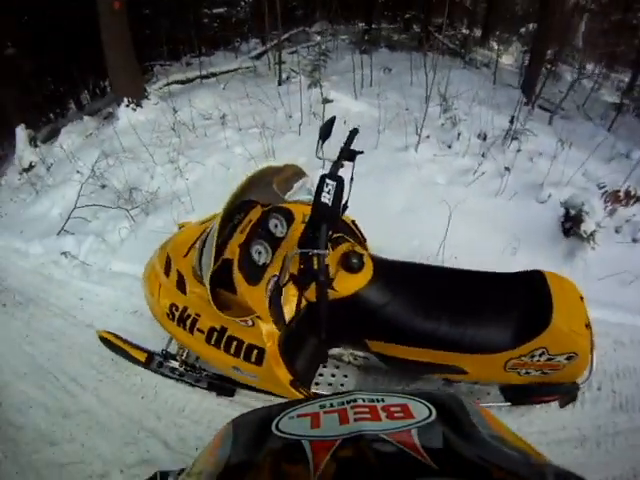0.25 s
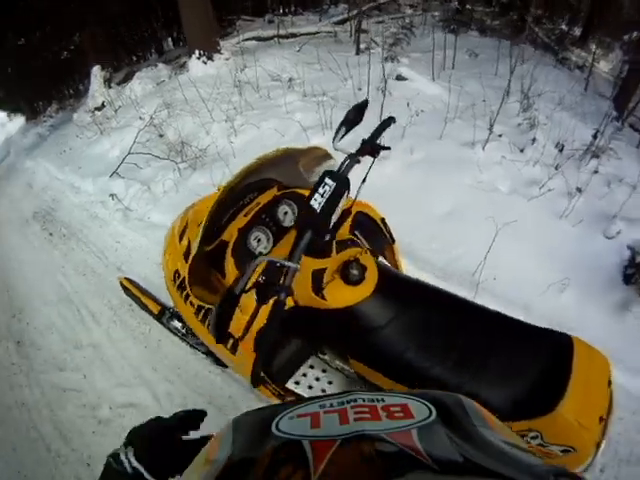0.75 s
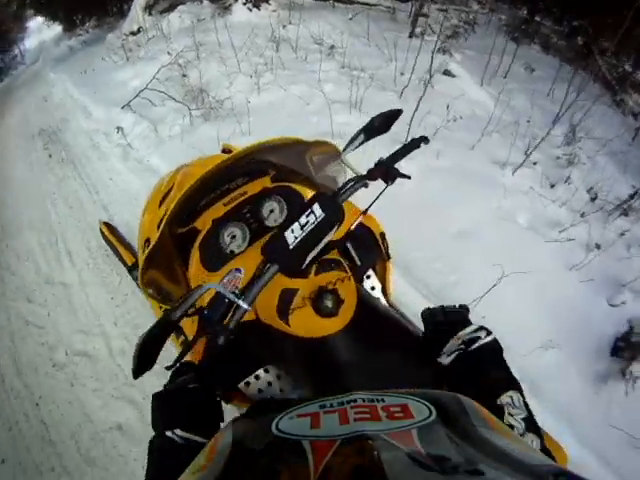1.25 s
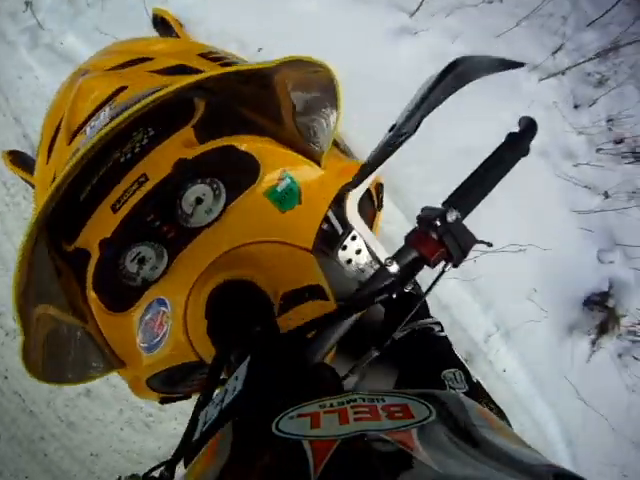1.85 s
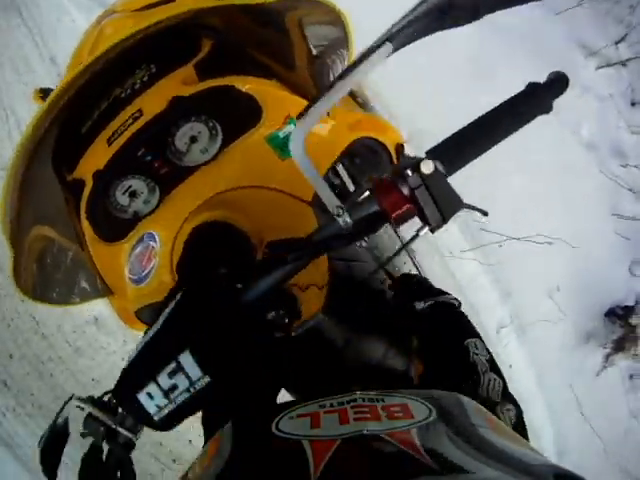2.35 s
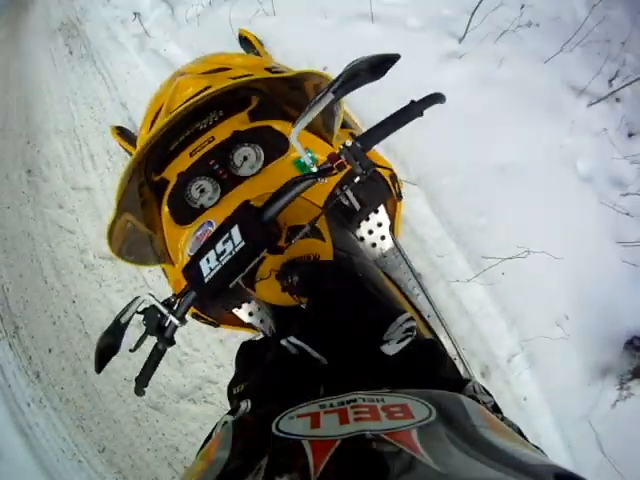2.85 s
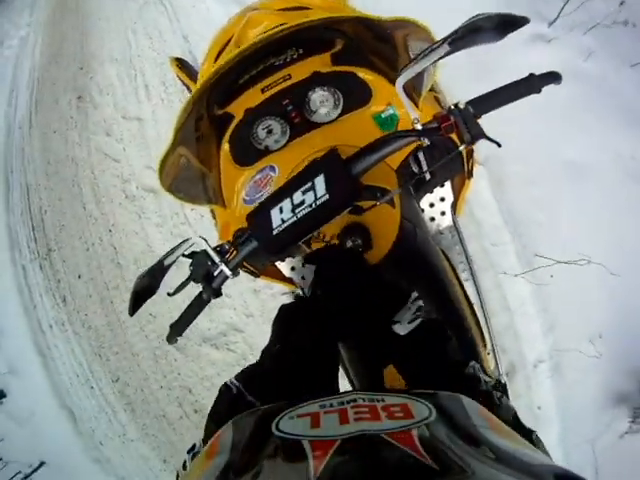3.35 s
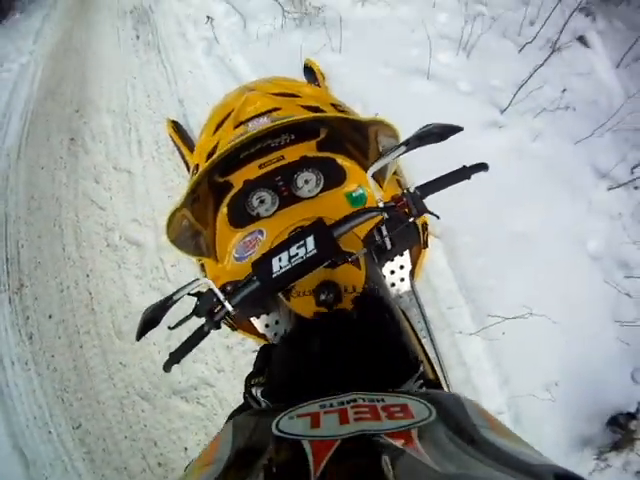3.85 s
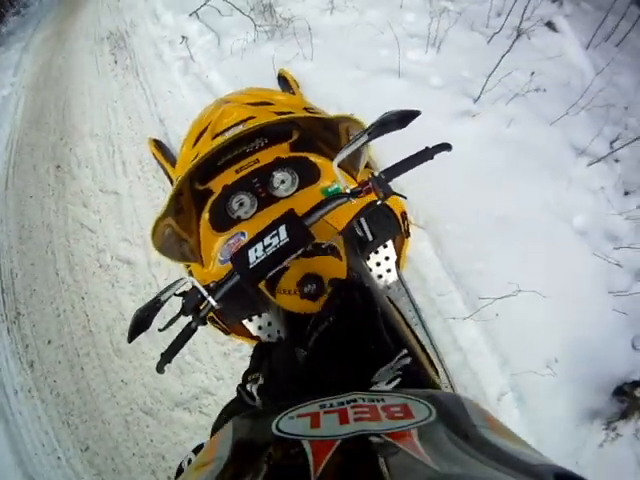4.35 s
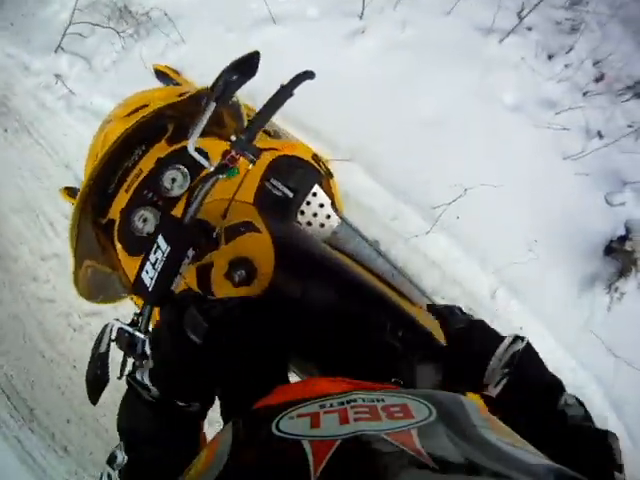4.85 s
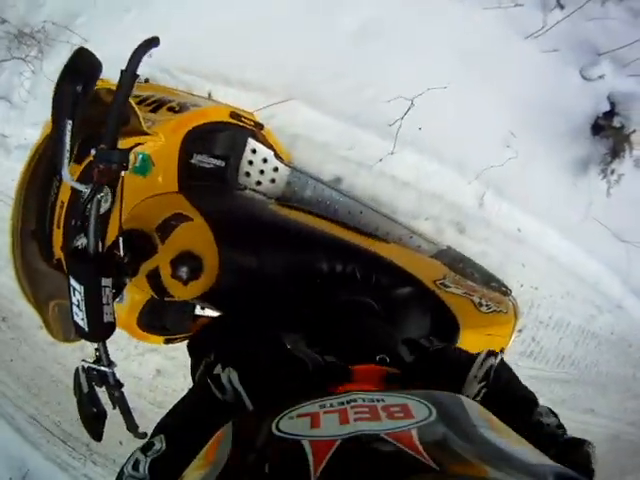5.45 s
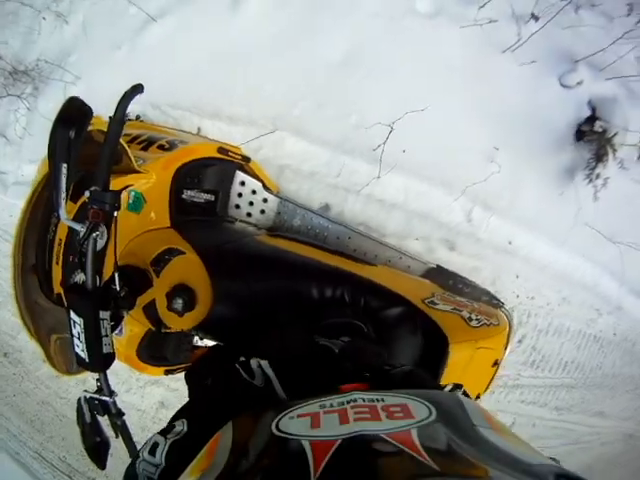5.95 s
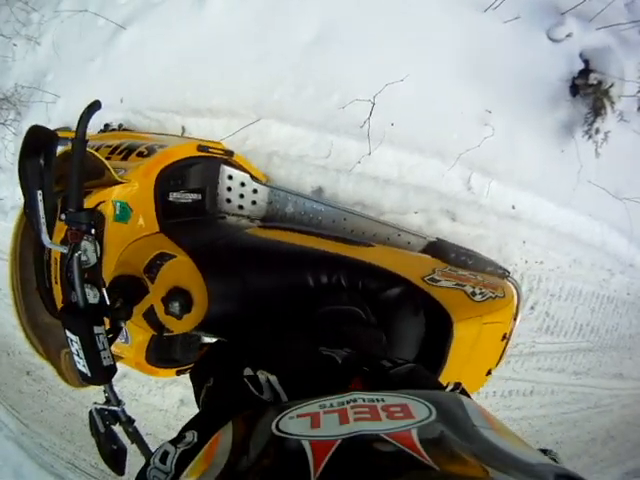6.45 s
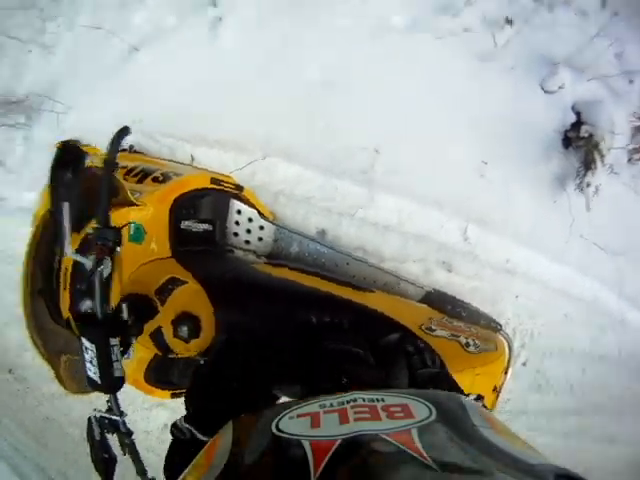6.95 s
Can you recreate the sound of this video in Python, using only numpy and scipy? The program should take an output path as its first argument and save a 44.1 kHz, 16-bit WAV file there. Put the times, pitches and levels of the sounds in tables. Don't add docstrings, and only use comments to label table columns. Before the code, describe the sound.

Close, boxy idling of a small two-cylinder snowmobile, popping and ticking as the rider climbs on, with rustles, thuds and sharp knocks on the microphone housing.

```python
import sys
import numpy as np
from scipy import signal
from scipy.io import wavfile
from scipy.ndimage import uniform_filter1d

SR = 44100
rng = np.random.default_rng(int(sys.argv[2]) if len(sys.argv) > 2 else 0)


def gain_from_db(level_db):
    decades = np.asarray(level_db, float) / 20
    return 10 ** decades


def persist_wave(psi):
    counts = np.round(np.clip(psi, -1, 1) * 32767).astype(np.int16)
    wavfile.write(sys.argv[1], SR, np.atleast_2d(counts).T)


N = 317520

# time in seconds, turns per second.
CRANK = [(0.0, 19.89), (1.0, 20.05), (1.4, 20.382), (2.0, 20.165), (2.2, 20.604), (2.8, 19.806),
         (3.2, 20.235), (3.6, 20.063), (4.0, 20.46), (4.4, 20.085), (4.6, 20.697), (4.8, 20.25),
         (5.6, 20.395), (5.8, 20.065), (7.0, 20.354), (7.2, 20.045)]
# time in seconds, lean over the engine, way past the silencer, turn to the outlet (0-1).
RIDER = [(0, 0.06, 0, .1), (.4, 0.2, 0.17, 0), (1.0, 0.19, 0.16, 0), (1.4, .35, 0.37, 0),
         (1.7, 0.8, 0.62, 0.5), (2.0, 1, 1, 0.88), (2.3, 0.92, 0.83, 0.9), (2.45, 0.98, 1, 0.67),
         (3.0, .9, 0.92, 0.63), (3.45, .9, 1, 0.6), (3.75, 0.76, 1, .4), (4.05, 0.48, 0.93, 0.06),
         (4.7, 0.28, 0.98, 0.04), (5.2, 0.48, 1, 0.95), (5.55, 0.43, 0.99, 0.86), (6.0, 0.32, 1, 0.8),
         (6.6, 0.23, 1.01, 0.73), (7.2, 0.4, 1, 0.7)]

# level in dB, then change in dB at full lean, past silencer, at outlet.
HUM_HEARD = [
    (-32, 1.1, -2.1, -2.15),
    (-43.5, 1.5, -18.5, 1),
    (-75, 13, 10, -0.56),
]
POPS_HEARD = [
    (-63.5, .3, 13.9, 1.5),
    (-84.5, .3, 18, 20.5),
]
RATTLE_HEARD = [
    (0, 2.5, -1.5, 1),
    (0, .3, 1.3, 2),
    (0, 0.93, -2.8, 2.2),
    (0, 8.4, -0.3, -1.6),
    (0, 4.5, 0.3, -0.7),
]
SLAP_HEARD = [
    (-54, 0, 0, 0),
    (-63, 1, -2, 7),
]
TICK_HEARD = [
    (-79, 24, 0, -1),
]

# multiple of crank speed, level in dB rms.
STEADY_ORDERS = [(2, -57.5), (4, -53), (7, -56), (10, -66.5), (12, -69.5), (14, -76), (18, -71.5)]

# time in seconds, low level in dB, high level in dB.
FULL_CHARGE = [
    (2.079, -54, -59),
    (2.161, -55, -60),
    (2.338, -37, -57),
    (2.66, -37, -56),
    (3.189, -42, -57),
    (3.312, -40, -42),
    (6.325, -43, -52),
    (6.349, -51, -45),
]
RUN_START_S, RUN_STEP_S = 5.674, .0747
RUN_LOW_DB, RUN_HIGH_DB, RUN_SWELL_DB = -40.5, -43, 5

REGION_HZ = [560, 870, 1250, 2000, 3400]
# frequency in Hz, density in dB per Hz.
RATTLE_COLOUR = [(100, -29), (170, -3), (189, -16), (317, -10), (517, -17.5), (591, -16.5), (1010, -19),
                 (1140, -15), (1910, -17), (2610, -19.5), (3030, -16), (4320, -35), (5010, -34),
                 (5900, -42), (7670, -72), (13000, -120)]
# frequency in Hz, burst over steady part in dB, lag in turns, first cylinder over second in dB.
BURST = [(300, 0, .28, 0), (900, -4, .28, 0), (1400, 0, 0, 1), (2100, 2, 0, -1), (3000, 3, 0, 2),
         (3700, 1, 0, 2), (4600, -5, 0, 0)]
# frequency in Hz, width in Hz, lift in dB.
CAVITY = [(610.4, 17, 7), (1053, 48, -5), (1159, 55, 5), (1690, 76, 7), (1942, 96, 7), (2260, 150, 1.5),
          (2344, 95, 8.5), (3026, 180, 7), (3810, 100, 7.5), (4904, 475, 11.5)]
RATTLE_DB = -49.5

# time in seconds, change of the lower cowl mode in dB.
VENT = [(1.9, -1), (2.3, 9), (2.5, 9), (2.65, -5), (3.3, -2), (3.9, 7), (4.4, 1), (5.1, 6), (5.3, -6)]
SHIELD_CLEARS_S, SHIELD_LOSS_DB = 2.35, 5

# time in seconds, peak in dB, length in seconds.
SWAYS = [(0.314, -57, 0.084), (.5, -45, 0.13), (0.708, -58, .03), (.9, -52, .05), (1.02, -49, 0.093),
         (1.464, -43, 0.058), (1.6, -54, .04), (1.83, -33.5, 0.054), (2.086, -44.5, .07),
         (2.228, -44, 0.11), (2.356, -43, .05), (2.526, -44, 0.15), (2.67, -44, .05), (2.78, -46, 0.14),
         (2.9, -46, .04), (3.06, -43, .06), (3.348, -43, 0.061), (3.663, -46, 0.14), (4.0, -52, .15),
         (4.455, -44, .15), (4.833, -52, .1), (5.25, -29, 0.044), (5.468, -38, .06), (5.93, -37, 0.046),
         (6.11, -44, 0.038), (6.24, -43.5, .05), (6.467, -41, .07), (6.991, -48, .08), (7.15, -52, .05)]
# time in seconds, ring in dB, thud in dB.
JOLTS = [
    (1.797, -25.5, -40),
    (2.99, -29, -36),
    (5.203, -34, -16),
    (5.232, -25, -30),
    (5.37, -39, -35),
    (5.43, -36, -37),
    (6.349, -43, -31),
]
MOUNT_HZ, MOUNT_WIDTH_HZ = 90, 8
SWAY_RISE_SHARE, STILL_DB = 0.66, -59
RUMBLE_DB, RUMBLE_FOLLOWS, RUMBLE_SMOOTH_S = -58.5, 0.79, .3

# start in seconds, length in seconds, panel in Hz, width in Hz, level in dB rms.
SCUFFS = [(.1, 1.25, 620, 32, -64), (.15, .35, 1900, 300, -55), (.39, .2, 670, 90, -58),
          (.46, .041, 1120, 130, -52), (.46, .2, 1950, 330, -51), (.56, .047, 1130, 40, -50),
          (1.6855, .004, 3000, 3000, -46), (1.7135, .012, 4700, 1800, -50), (2.22, .3, 2990, 90, -58),
          (2.97, .051, 213, 34, -49), (2.975, .051, 680, 130, -54), (4.815, .012, 4750, 500, -51),
          (5.167, .11, 1880, 540, -49.5), (5.17, .09, 5000, 1800, -65), (5.184, .09, 660, 200, -54),
          (5.35, .07, 5400, 1500, -67), (5.363, .07, 620, 180, -55), (5.94, .16, 4800, 700, -64),
          (6.8288, .005, 2600, 4000, -40), (6.946, .076, 670, 400, -53), (7.001, .058, 1900, 460, -49.5)]

# time in seconds, housing peak in dB, low shell thump in dB, bright edge in dB.
KNOCKS = [
    (1.6872, -31, -58, -54),
    (1.7958, -1.5, -28.5, -34),
    (2.9903, -32, -53, -65),
    (4.82, -50, -56, -66),
    (5.2435, -33, -69, -63),
    (6.8308, -33, -54, -49),
    (7.1761, -35, -64, -65),
]
# frequency in Hz, level in dB, t60 in seconds.
HOUSING = [(1956, -1, 0.025), (2310, -2.5, 0.017), (1575, -4, 0.027), (2515, 4.5, 0.012)]
SHELL = [(196, -3.5, 0.1), (317, -5, 0.055), (638, 6.5, 0.038), (818, 2.5, 0.04), (1136, -0.5, 0.023)]
EDGE = [(3540, -8, 0.0089), (3610, 10, 0.018), (4874, 8.5, 0.015), (5700, -9, 0.028)]


def rms_one(x):
    return x / np.sqrt(np.mean(x ** 2) + 1e-20)


def in_time(rows):
    s, *columns = np.transpose(rows)
    return [np.interp(np.arange(N) / SR, s, c) for c in columns]


def at_hz(points, hz, axis=1):
    points = np.array(points)
    return np.interp(np.log(hz), np.log(points[:, 0]), points[:, axis])


def drift(rate_hz):
    r = np.exp(-80 * np.pi * rate_hz / SR)
    noise = rng.standard_normal(N // 40 + 2002)
    slow = signal.lfilter([1], [1, -2 * r, r * r], noise)[2000:]
    return np.interp(np.arange(N) / 40, np.arange(len(slow)), rms_one(slow))


def resonance(x, hz, width_hz):
    r = np.exp(-np.pi * width_hz / SR)
    poles = [1, -2 * r * np.cos(2 * np.pi * hz / SR), r * r]
    return signal.lfilter(np.array([1, 0, -1]) * (1 - r * r) / 2, poles, x)


def band_pass(x, low_hz, high_hz, order=2):
    return signal.sosfilt(signal.butter(order, [low_hz, high_hz], "band", fs=SR, output="sos"), x)


def ring(times_s, db, hz, t60_s, spread_hz, path_hz=None, count=1):
    clicks = np.full(N, 1e-18)
    clicks[(np.asarray(times_s) * SR).astype(int)] = gain_from_db(np.asarray(db))
    for _ in range(count):
        clicks = resonance(clicks, path_hz or hz, spread_hz)
    r, w = gain_from_db(-60 / (t60_s * SR)), 2 * np.pi * hz / SR
    return signal.lfilter([0, np.sin(w)], [1, -2 * r * np.cos(w), r * r], clicks)


def heard(parts):
    return [db + np.dot(change_db, in_time(RIDER)) for db, *change_db in parts]


def passes(turns, angle_turns, count):
    return np.nonzero(np.diff(np.floor(count * (turns - angle_turns))))[0] / SR


def level_at(parts, s, uneven_db):
    chance_db = uneven_db * rng.standard_normal(400)[:len(s)]
    return [db[(s * SR).astype(int)] + chance_db for db in heard(parts)]


def exhaust_hum(turns):
    sixth_db, eighth_db, sixteenth_db = heard(HUM_HEARD)
    orders = [(6, sixth_db, 0.84), (8, eighth_db, 1.25), (16, sixteenth_db - 6.0, 1.65)]
    orders += [(k, db, 3.0) for k, db in STEADY_ORDERS]
    out = 0
    for k, db, waver_db in orders:
        wobble_rad = 0.54 * waver_db * drift(6.1)
        level = np.sqrt(2) * gain_from_db(db + waver_db * drift(23.0))
        out = out + level * np.sin(2 * np.pi * k * turns + wobble_rad)
    return out


def full_run(count=8):
    k = np.arange(count)
    swell_db = -RUN_SWELL_DB * np.exp(-k / 1.2)
    return np.array([RUN_START_S + RUN_STEP_S * k, RUN_LOW_DB + swell_db, RUN_HIGH_DB + swell_db])


def pops(turns):
    s = passes(turns, .17, count=2)
    usual = [s, *level_at(POPS_HEARD, s, 4.5)]
    full = np.hstack([np.transpose(FULL_CHARGE), full_run()])
    full = full - [[.003], [0], [0]]
    s, low_db, high_db = np.hstack([usual, full])
    out = ring(s, low_db + 2, 289, 0.023, 290)
    out += ring(s, low_db - 4.5, 216.0, 0.075, 190)
    return out + ring(s, high_db - 1, 820, 0.021, 300)


def engine_rattle(turns, start_turns=.38, swell_turns=.085):
    regions_db = np.array(heard(RATTLE_HEARD))
    regions_db -= regions_db.mean(axis=1, keepdims=True)
    edges_hz = np.geomspace(170, 5900, 22)
    white, shared = rng.standard_normal((2, N)), rng.standard_normal(400)
    cylinder = np.resize([.5, -.5], 400)
    out = 0
    for k, (low_hz, high_hz) in enumerate(zip(edges_hz, edges_hz[1:])):
        hz = np.sqrt(low_hz * high_hz)
        firings = 2 * (turns + 1 - start_turns - at_hz(BURST, hz, axis=2))
        since = firings % 1 / 2 / swell_turns
        uneven_db = 0.8 * shared + 1.3 * rng.standard_normal(400)
        strength = gain_from_db(at_hz(BURST, hz) + at_hz(BURST, hz, axis=3) * cylinder + uneven_db)
        gate = 1 + strength[firings.astype(int)] * since * np.exp(1 - since)
        place = np.interp(np.log(hz), np.log(REGION_HZ), np.arange(5))
        below_db, above_db = regions_db[int(place)], regions_db[min(int(place) + 1, 4)]
        level_db = below_db + place % 1 * (above_db - below_db)
        noise = band_pass(white[k % 2] * rms_one(gate), low_hz, high_hz, order=3)
        out = out + gain_from_db(at_hz(RATTLE_COLOUR, hz) + level_db) * noise
    out = out + sum((gain_from_db(db) - 1) * resonance(out, hz, width_hz) for hz, width_hz, db in CAVITY)
    return gain_from_db(RATTLE_DB) * rms_one(out)


def slap(turns):
    s = passes(turns, .41, count=1)
    low_db, high_db = level_at(SLAP_HEARD, s, 1.6)
    low_db = low_db + np.interp(s, *np.transpose(VENT))
    return ring(s, low_db + 3, 2990, .05, 200) + ring(s, high_db + 7, 3660, .05, 200)


def tick(turns):
    s = passes(turns, .925, count=1)
    shaded = (s < SHIELD_CLEARS_S) * (s > 1.5)
    db = level_at(TICK_HEARD, s, 2.2)[0] - SHIELD_LOSS_DB * shaded
    return ring(s, db + 5, 5700, .008, 1500) + ring(s + .0008, db + 8, 5150, .022, 900)


def sway_db():
    t, power = np.arange(0, N, 64) / SR, gain_from_db(STILL_DB) ** 2
    for s, db, length_s in SWAYS:
        away = np.maximum((t - s) / length_s, (s - t) / length_s / SWAY_RISE_SHARE)
        power = power + gain_from_db(db - 5 * away ** 1.36) ** 2
    return np.interp(np.arange(N) / SR, t, 10 * np.log10(power))


def mount():
    swing_hz = MOUNT_HZ + 0.41 * MOUNT_WIDTH_HZ * drift(7.3)
    shake_db = sway_db()
    shake = np.sqrt(2) * gain_from_db(shake_db) * np.sin(2 * np.pi * np.cumsum(swing_hz) / SR)
    busy_db = uniform_filter1d(shake_db - shake_db.mean(), int(RUMBLE_SMOOTH_S * SR))
    low_noise = rms_one(band_pass(rng.standard_normal(N), 13, 59))
    rumble = gain_from_db(RUMBLE_DB + RUMBLE_FOLLOWS * busy_db) * low_noise
    s, ring_db, thud_db = np.transpose(JOLTS)
    jolts = ring(s, ring_db, MOUNT_HZ, 0.16, 67) + ring(s, thud_db + 1.5, 46, 0.048, 60)
    return shake + rumble + jolts


def scuffs():
    out = np.zeros(N)
    for s, length_s, hz, width_hz, db in SCUFFS:
        i, n = int(s * SR), int(length_s * SR)
        rub = rng.standard_normal(60000)[:n]
        panel = resonance(resonance(rub, hz, width_hz), hz, 2 * width_hz)
        out[i:i + n] += gain_from_db(db) * np.hanning(n) ** .5 * rms_one(panel)
    return out


def knocks(lead_s=.0016):
    s, housing_db, shell_db, edge_db = np.transpose(KNOCKS)
    s = s - lead_s
    out = sum(ring(s, housing_db + db, hz, t60_s, 470, path_hz=2064, count=2) for hz, db, t60_s in HOUSING)
    out += sum(ring(s, shell_db + db, hz, t60_s, 230) for hz, db, t60_s in SHELL)
    return out + sum(ring(s, edge_db + db, hz, t60_s, 760) for hz, db, t60_s in EDGE)


def scene():
    turns = np.cumsum(in_time(CRANK)[0]) / SR
    engine = exhaust_hum(turns) + pops(turns) + engine_rattle(turns) + slap(turns) + tick(turns)
    return (engine + mount() + scuffs() + knocks())[None]


def roll_off(x):
    return signal.sosfilt(signal.butter(12, 16360, fs=SR, output="sos"), x)


def record(dry):
    chip_rate_hz, hold_samples = 12000, 4
    rounded = .66 * np.tanh(dry / .66)
    coarse = signal.resample(rounded, N * chip_rate_hz // SR, axis=1)
    held = signal.resample(np.repeat(coarse, hold_samples, axis=1), N, axis=1)
    top_cut = signal.cheby2(14, 60, 15880, fs=SR, output="sos")
    return roll_off(signal.sosfilt(top_cut, held))


dry = scene()
out = record(dry)
persist_wave(out)
```